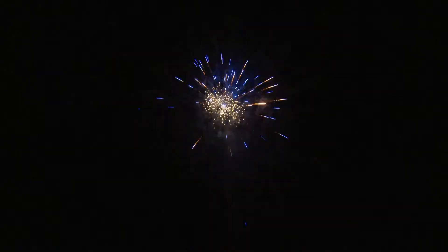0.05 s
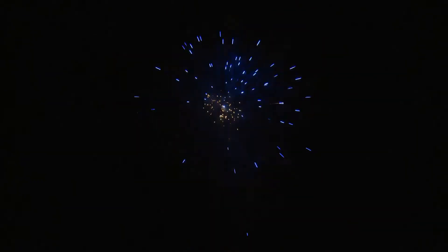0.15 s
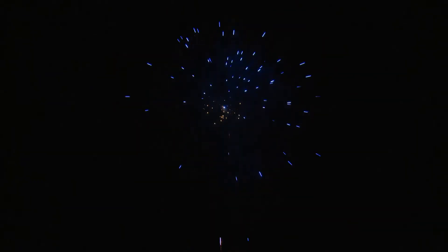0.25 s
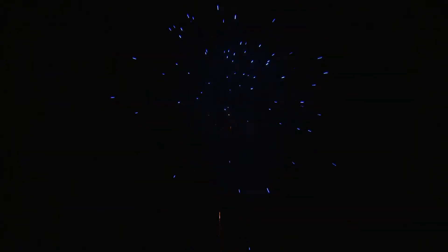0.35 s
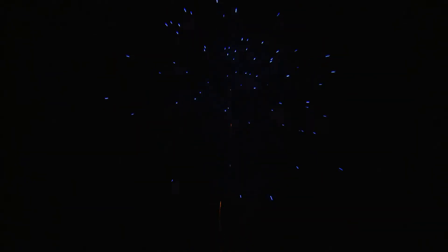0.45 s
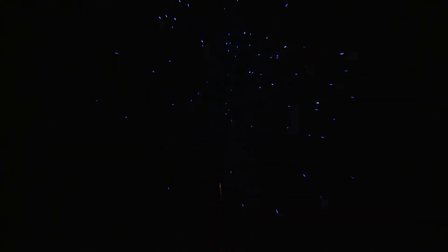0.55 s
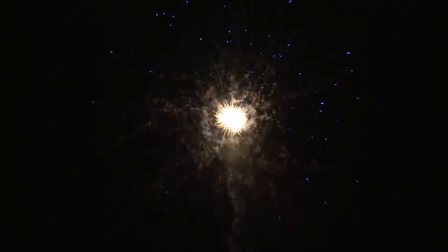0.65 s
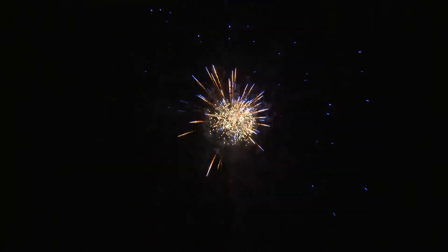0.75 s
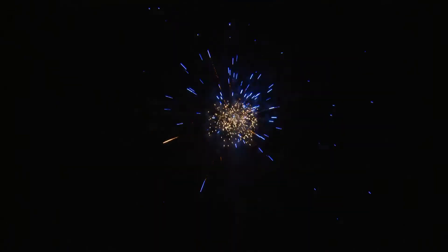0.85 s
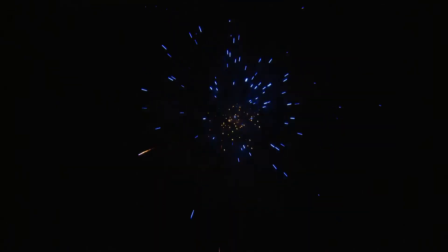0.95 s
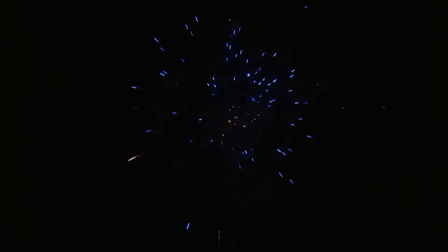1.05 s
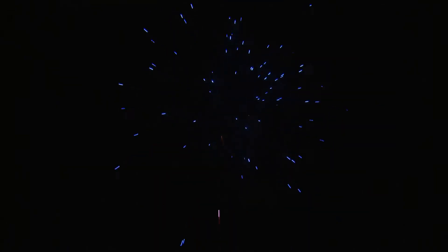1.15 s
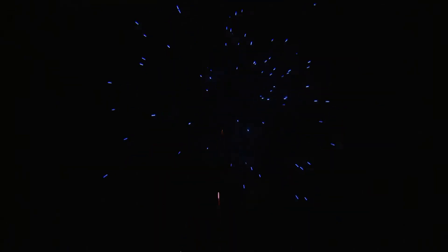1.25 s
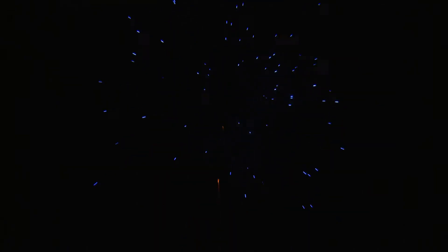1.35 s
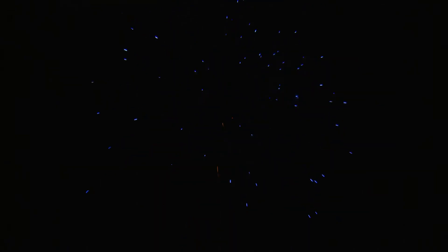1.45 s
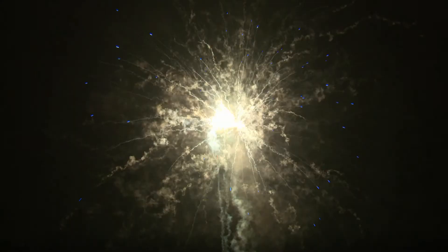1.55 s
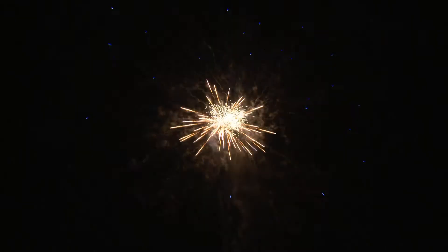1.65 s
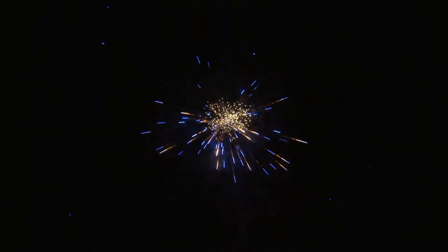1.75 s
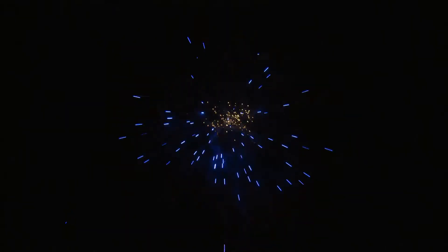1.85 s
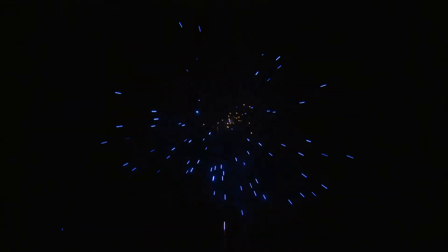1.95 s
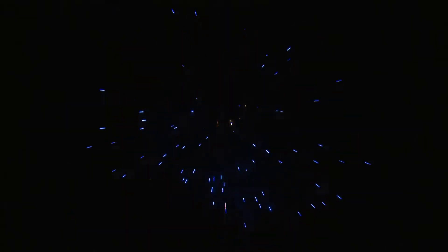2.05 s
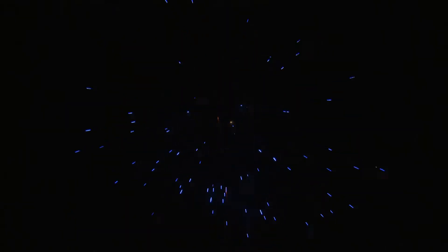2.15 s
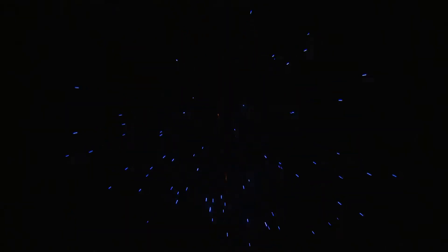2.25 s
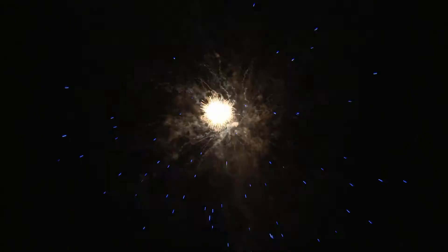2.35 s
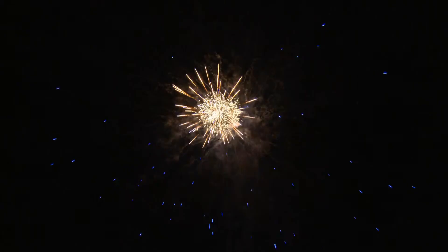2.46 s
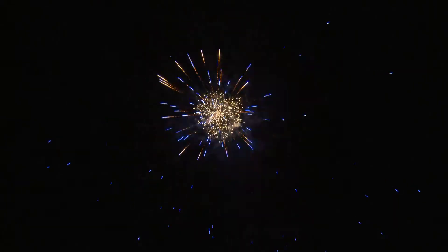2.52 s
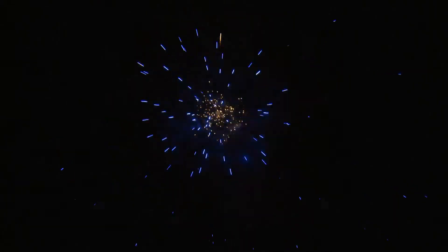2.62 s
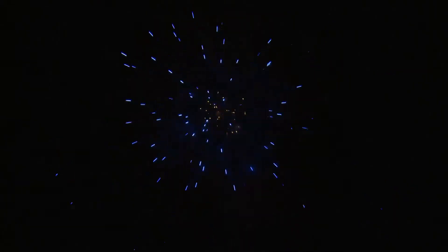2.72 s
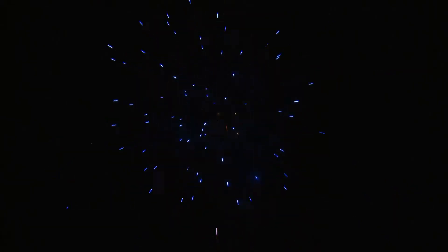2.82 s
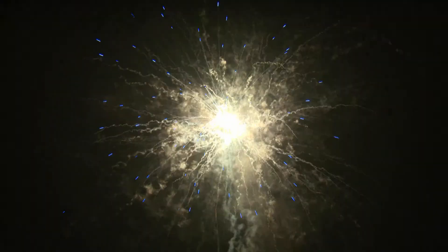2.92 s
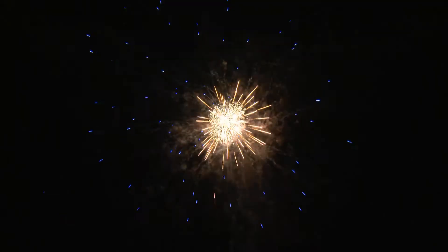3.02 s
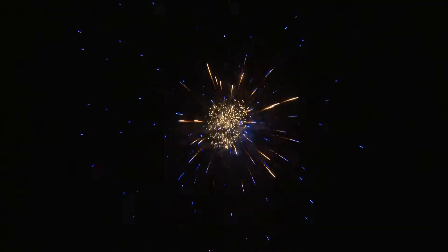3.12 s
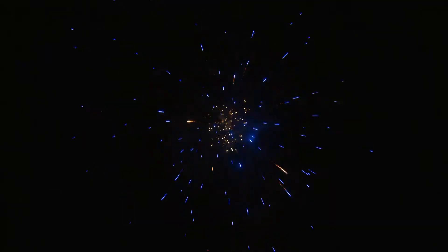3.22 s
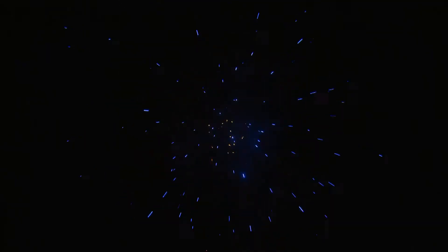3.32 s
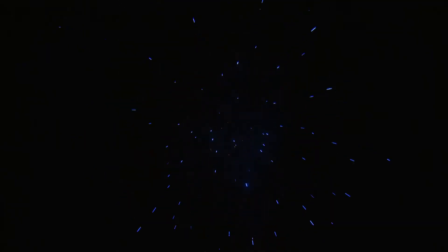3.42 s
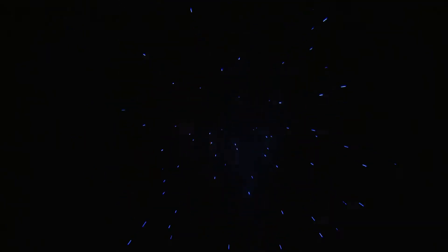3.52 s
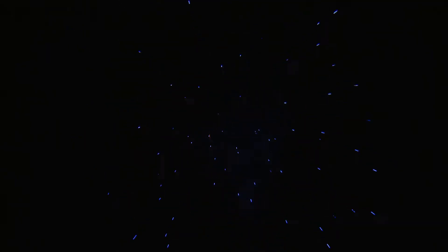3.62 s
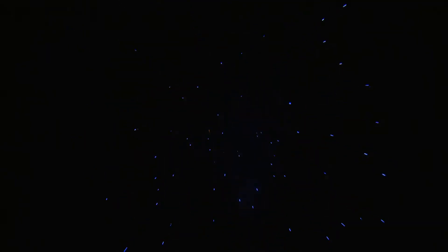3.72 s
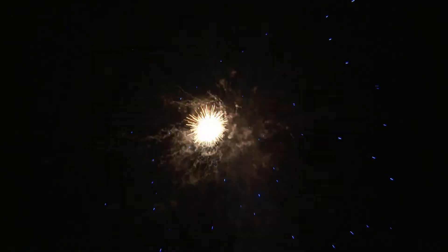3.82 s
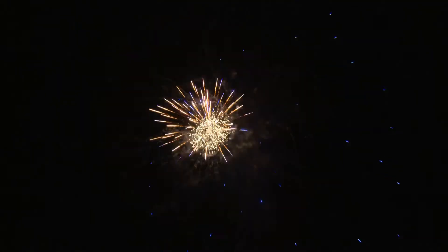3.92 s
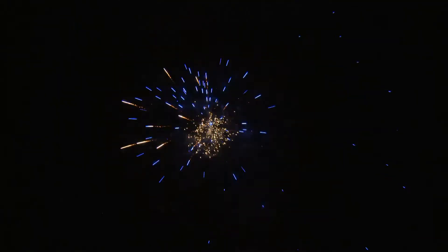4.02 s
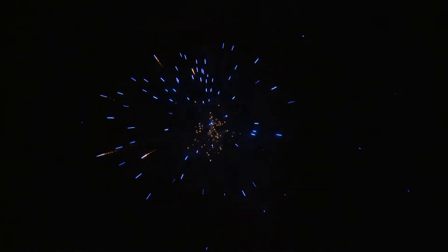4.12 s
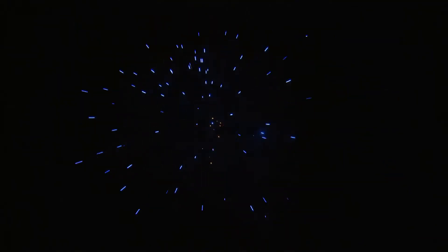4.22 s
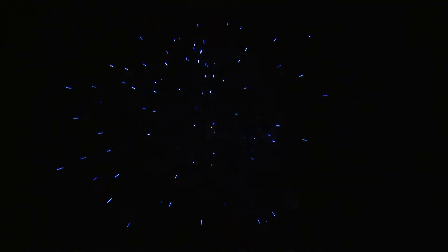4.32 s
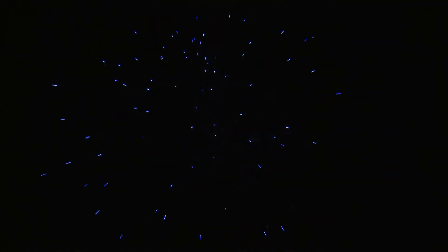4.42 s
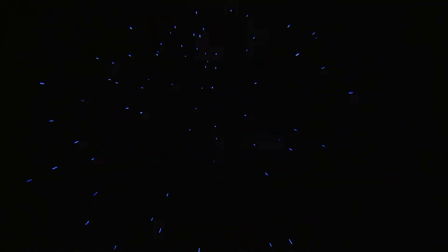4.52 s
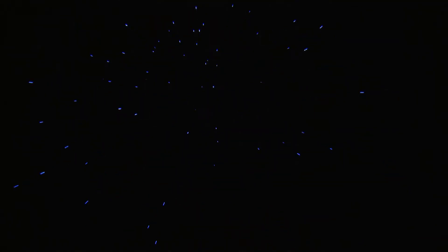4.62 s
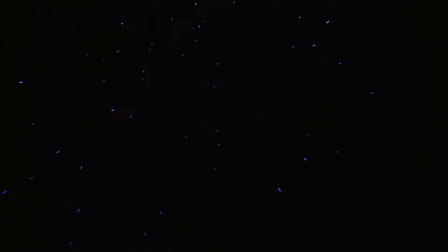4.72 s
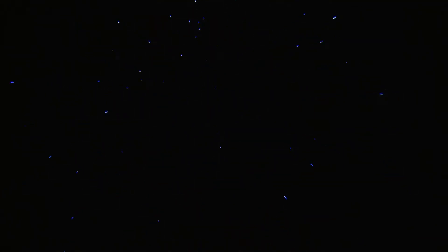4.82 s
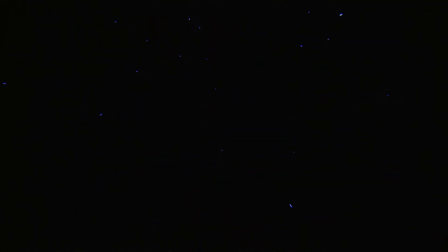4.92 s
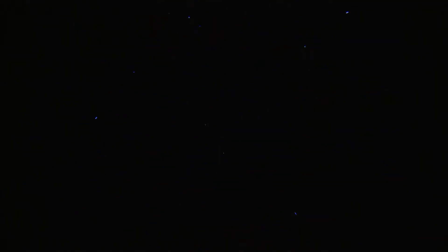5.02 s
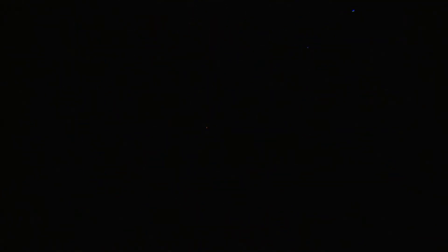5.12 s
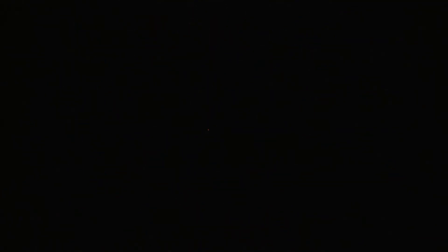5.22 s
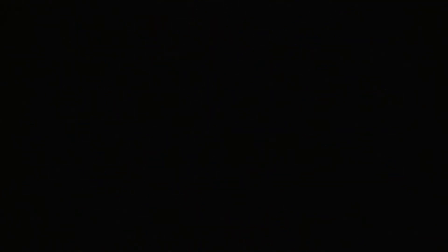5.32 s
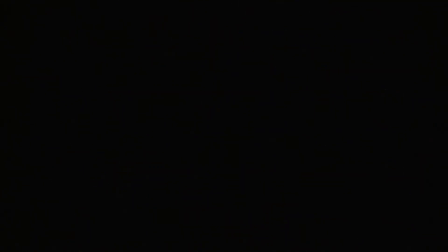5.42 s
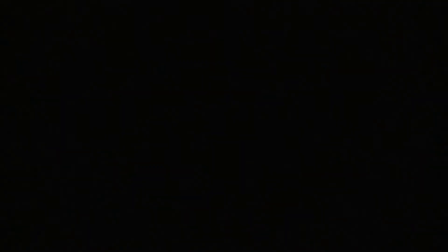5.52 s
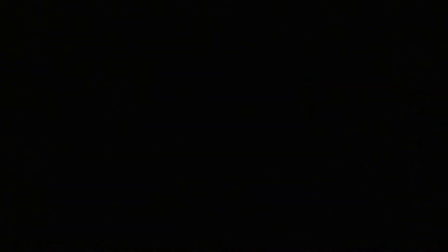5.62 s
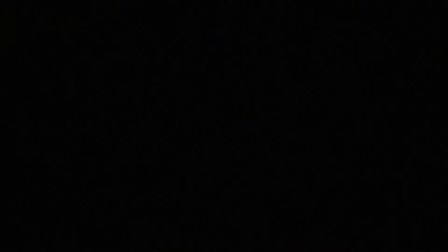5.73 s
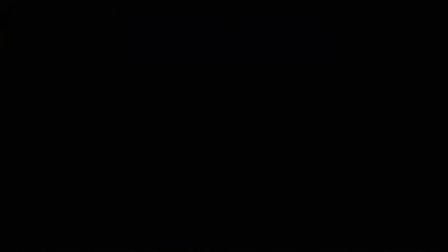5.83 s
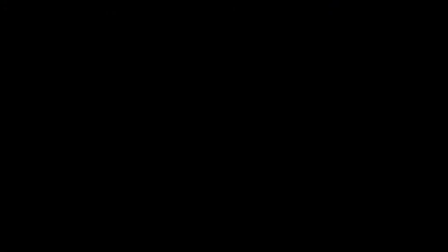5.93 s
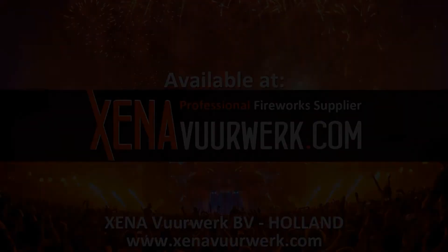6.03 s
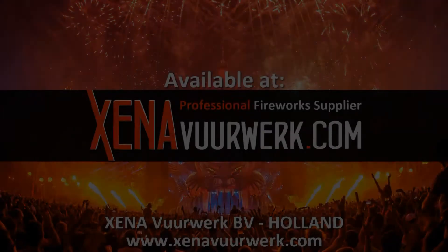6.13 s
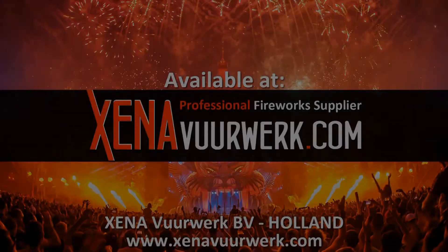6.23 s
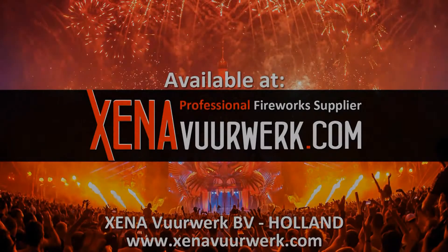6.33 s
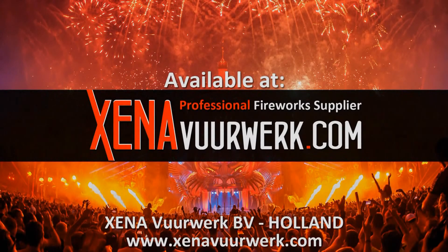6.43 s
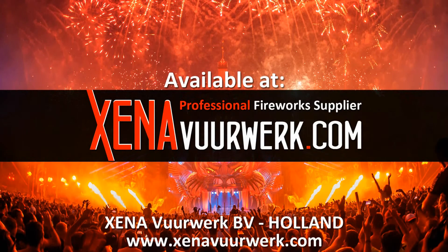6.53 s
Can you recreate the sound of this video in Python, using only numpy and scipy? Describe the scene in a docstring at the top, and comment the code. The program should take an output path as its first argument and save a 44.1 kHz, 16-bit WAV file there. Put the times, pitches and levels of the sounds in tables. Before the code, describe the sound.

A fireworks cake fires outdoors at night over an open field. Six very loud, sharp shell bursts overload a small camera microphone, roughly half a second to a second apart. Three are preceded by short hollow mortar thumps with a hiss of gas. Each bang leaves close scatter, a brief crackling sizzle, soft returned thuds from far walls and trees, and a low roll. Faint traffic hum lies below; everything fades out.

```python
"""Fireworks cake over an open field, at night

Mortar tubes thump, crack and hiss; shells burst overhead as steep pressure pushes that overload a small
camera microphone on a tripod. Decaying noise makes the scatter near the camera, the roll over the field
and the sizzling stars; far walls and tree lines return soft thuds, snaps and scatter.
A low noise hum of distant traffic with a few ticks lies below, and all fades out."""
import sys
import numpy as np
from scipy import signal
from scipy.fft import rfft, irfft, next_fast_len
from scipy.io import wavfile
from scipy.ndimage import uniform_filter1d, map_coordinates

SR = 44100
rng = np.random.default_rng(int(sys.argv[2]) if len(sys.argv) > 2 else 0)


def wav_record(signal):
    """Record a signal, one row per channel, as 16-bit PCM in the file named by sys.argv[1]."""
    frames = np.transpose(np.atleast_2d(signal))
    bounded = np.clip(frames, -1, 1)
    # unit amplitude maps onto the largest positive 16-bit level
    quanta = np.round(bounded * 32767).astype(np.int16)
    wavfile.write(sys.argv[1], SR, quanta)


def ratio_of_db(decibels):
    """Turn decibels (scalar or array-like) into linear amplitude factors; 0 dB maps to 1."""
    return 10 ** (np.asarray(decibels, float) / 20)


N = 289737  # length in samples

# Distant traffic behind the field. Each row: frequency in Hz, relative density in dB per Hz.
HUM_SPECTRUM = [(15, -33), (25, -7.5), (65, -1.5), (138, 1.5), (182, 2), (232, -11.5), (524, -16),
                (878, -23.5), (1180, -18), (1550, -27), (1900, -39.5), (3500, -45.5), (4860, -45.5),
                (6550, -54.5), (14400, -61), (16500, -84.5)]
# Small ticks. Each row: start in seconds, level in dB before the envelope.
TICKS = [(3.895, -32.5), (4.6805, -30.5), (5.117, -35.5), (5.281, -29), (5.97, -34)]
# Width of noise at the microphone. Each row: frequency in Hz, side against mid in dB.
SIDE_LEVEL = [(60, -25), (380, -14), (800, -28.5), (1500, -32), (12000, -16.5)]
# Far walls and tree lines. Each row: delay in seconds, thud level in dB, treble tilt in dB,
# scatter level in dB, swell time in seconds.
WALLS = [(0.371, -36, 0.5, -38, 0.0066), (0.5148, -21, -4, -31.5, 0.0078), (0.601, -44.5, -2.5, -34, .008),
         (0.786, -33, -3.5, -67.5, .01), (.825, -54.5, 14.5, -57, 0.02), (.995, -53.5, -4.5, -46.5, 0.04),
         (1.1, -67.5, -7, -47.5, 0.087)]
# Scatter returned by the walls. Each row: frequency in Hz, relative density in dB per Hz.
WALL_SPECTRUM = [(59, -31.5), (100, -3.5), (267, -9), (619, -15), (836, -17), (1490, -21.5), (2520, -48.5),
                 (4870, -43), (12000, -72.5), (15600, -99), (22000, -120)]
# Mortar lifts. Each row: start in seconds, thump level in dB.
LIFTS = [(0.7064, -17), (1.559, -16), (2.4291, -15.5)]
# Tones of the mortar tube. Each row: frequency in Hz, level in dB against the thump level,
# time of the peak in ms, spread in ms.
TUBE_TONES = [(135, 11.5, 5.63, 2.5), (387, 3, 7.04, 1.95), (224, -7, 16, 11), (567, -20.5, 1.1, 3.4),
              (1300, -33, 2.5, 6)]
# Gas leaving the tube. Each row: frequency in Hz, relative density in dB per Hz.
GAS_SPECTRUM = [(590, -31.5), (1000, 2.5), (3050, -11), (5480, -6), (6690, -10.5), (14300, -20.5),
                (16500, -48)]
# Shell bursts. Each row: time of the shock in seconds, blast level in dB, right channel lag in ms,
# right channel treble in dB, extra path of the wall returns in ms.
BURSTS = [(.1067, 13, 0.29, -11.5, -4.5), (0.8848, 15.5, 0.34, -1, 0.6), (1.8027, 16, .3, 5.5, 1.5),
          (2.5885, 16, 0.2, -5, -2.5), (3.1877, 16, 0.17, -6.5, -0.5), (4.0341, 14, 0.25, -13, -0.5)]
# Paths of a burst to the microphone: tripod, air, ground, nearby things.
# Each row: time after the shock in ms, push level in dB, body ring level in dB.
PATHS = [(-2.1, -22, -20), (0, 0, -15), (6.1, -21, -15), (16.8, -34, -5)]
# Resonances of the camera body. Each row: frequency in Hz, width in Hz, level in dB.
BODY = [(369, 31, -6.5), (565, 33, -6.5), (1210, 270, -15), (2110, 330, -21)]
# Scatter near the camera, of bursts and lifts. Each row: frequency in Hz, relative density in dB per Hz.
NEAR_SPECTRUM = [(18, -34.5), (30, -8.5), (80, 1), (306, -3.5), (455, -5), (533, -3), (881, -16.5),
                 (1210, -10), (2220, -24.5), (4900, -31.5), (14800, -45), (16500, -63.5)]
# Its decay. Each row: frequency in Hz, time to fall 60 dB in seconds.
NEAR_T60 = [(60, 0.2), (300, 0.22), (1200, .16), (2500, 0.11), (5000, 0.16), (9000, .2), (14000, 0.079)]
# Roll over the field. Each row: frequency in Hz, relative density in dB per Hz.
FIELD_SPECTRUM = [(18, -45), (30, -19), (185, -6.5), (314, -11.5), (432, -12.5), (835, -25), (1180, -23),
                  (1940, -46), (3200, -43.5), (4900, -39), (6500, -46.5), (10500, -48), (15200, -53),
                  (16500, -77.5)]
# Its decay. Each row: frequency in Hz, time to fall 60 dB in seconds.
FIELD_T60 = [(60, 1.7), (500, 0.46), (2000, 1.4), (5000, .9), (8000, 0.89), (13000, 0.42)]
# Sizzle of the stars overhead. Each row: frequency in Hz, relative density in dB per Hz.
STARS_SPECTRUM = [(600, -32.5), (1000, 2.5), (3050, -16), (5000, -9.5), (6700, -12.5), (10000, -15.5),
                  (14300, -15.5), (16500, -47)]
# Its decay. Each row: frequency in Hz, time to fall 60 dB in seconds.
STARS_T60 = [(2000, .2), (6000, 0.28), (14000, 0.17)]
# Span in which the right channel thins: from, to, in seconds.
THIN_SPAN = (.101, .119)
# Fade to silence: from, to, in seconds.
FADE_SPAN = (5.03, 6.023)
# The recorder's treble rolls off between these: from, to, in Hz.
TREBLE_EDGE = (15800, 16700)


def unit(x):
    """Scale to rms 1."""
    return x / np.sqrt(np.mean(x ** 2) + 1e-20)


def along(points, hz):
    """Read (Hz, value) points on a log frequency axis."""
    f, v = np.transpose(points)
    return np.interp(np.log(hz + 1), np.log(f + 1), v)


def filtered(x, response):
    """Apply a complex response of frequency."""
    n = x.shape[-1]
    m = next_fast_len(n + 8192)
    return irfft(rfft(x, m) * response(np.fft.rfftfreq(m, 1 / SR)), m)[..., :n]


def low_pass(hz):
    """First-order response that dulls sound above hz."""
    return lambda f: 1 / (1 + 1j * f / hz)


def rise(t, seconds):
    """Straight onset from 0 to 1."""
    return np.clip(t / seconds, 0, 1)


def add(into, x, s):
    """Mix x into the scene at time s."""
    k = round(s * SR)
    into[:, k:k + x.shape[-1]] += x[..., :N - k]


def rush(n, spectrum):
    """Nearly centred stereo noise of rms 1: shaped mid noise with a weaker, independent side."""
    def response(hz):
        return ratio_of_db(along(spectrum, hz)) * [np.ones_like(hz), ratio_of_db(along(SIDE_LEVEL, hz))]
    mid, side = filtered(rng.standard_normal((2, n)), response)
    return unit(np.array([mid + side, mid - side]))


def dying(seconds, spectrum, t60, lumpy_db):
    """Scattered sound: each frequency dies at its own speed, in lumps as separate echoes arrive."""
    n = round(seconds * SR)
    hz, t, z = signal.stft(rush(n, spectrum), SR, nperseg=256)
    lumps = uniform_filter1d(rng.standard_normal(z.shape[1:]), size=3, axis=1)
    lumps = unit(uniform_filter1d(lumps, size=12, axis=0))
    decay_db = -60 * t / along(t60, hz)[:, None]
    return signal.istft(z * ratio_of_db(lumpy_db * lumps + decay_db), SR, nperseg=256)[1][:, :n]


def ticks():
    """Small ticks, each a sine with a rounded onset that rings briefly."""
    out, t = np.zeros((2, N)), np.arange(2000) / SR
    pitch_hz, t60_s, onset_s = 1280, 0.017, 0.00084
    for s, db in TICKS:
        envelope = ratio_of_db(db - 60 * t / t60_s) * (1 - np.exp(-t / onset_s))
        add(out, envelope * np.sin(2 * np.pi * pitch_hz * t), s)
    return out


def hum():
    """Distant traffic: shaped noise whose low part throbs and whose upper part flutters slightly."""
    now = np.arange(N) / SR
    throb_rate, flutter_rate = 14, 30  # random levels per second, smoothly joined
    throb = map_coordinates(rng.standard_normal(N * throb_rate // SR + 4), [now * throb_rate])
    flutter = map_coordinates(rng.standard_normal(N * flutter_rate // SR + 4), [now * flutter_rate])
    noise = rush(N, HUM_SPECTRUM)
    low = filtered(noise, lambda f: 1 / (1 + (f / 300) ** 4))
    throbbing = ratio_of_db(-48.5 + 3.2 * throb) * unit(low)  # dB
    fluttering = ratio_of_db(-54.5 + 0.44 * flutter) * unit(noise - low)
    return throbbing + fluttering


def walls():
    """Distance rounds the shock into a soft swing, a dull snap that rings the body, and scatter."""
    out, t = np.zeros((2, N)), np.arange(SR // 2) / SR
    for delay, thud_db, treble_db, scatter_db, swell in WALLS:
        u = t / .0065
        thud = -np.sin(2 * np.pi * 85 * (t + .001)) * u * np.exp(1 - u) * rise(t, 0.0043)
        ring_hz = rng.normal(1100, 110)
        snap = np.exp(-((t - swell) / .0024) ** 2) * np.sin(2 * np.pi * ring_hz * t)
        snap_db = scatter_db - 2.5 - 4.2 * swell / 0.042  # a slower swell blurs the snap

        def surface(f):  # foliage returns more treble than stone
            return ratio_of_db(treble_db * f ** 2 / (f ** 2 + 2500 ** 2))
        scatter = filtered(rush(len(t), WALL_SPECTRUM), surface) * (t / swell) * np.exp(1 - t / swell)
        echo = ratio_of_db(thud_db) * thud + ratio_of_db(snap_db) * snap + ratio_of_db(scatter_db) * scatter
        add(out, ratio_of_db(rng.normal(0, 0.73)) * echo, delay)  # level varies from burst to burst
    return out


def lifts():
    """The tube swells into a thump of short tones, cracks, and hisses as the shell leaves."""
    out, t = np.zeros((2, N)), np.arange(SR // 2) / SR
    ms = t * 1000
    gas_delay_s, gas_t60_s = 0.012, 0.052
    for s, db in LIFTS:
        thump = sum(ratio_of_db(level) * np.exp(-((ms - peak) / spread) ** 2) * np.cos(2 * np.pi * hz * t)
                    for hz, level, peak, spread in TUBE_TONES)
        muzzle = ratio_of_db(-1.0) * np.exp(-(ms / .9) ** 2)
        crack = ratio_of_db(-38 - 60 * np.abs(t - .004) / .025) * (t > .0035) * rush(len(t), GAS_SPECTRUM)
        # the shell clears the muzzle
        gas = ratio_of_db(db - 17.5 - 60 * (t - gas_delay_s) / gas_t60_s) * rise(t - gas_delay_s, .001)
        gas = gas * rush(len(t), GAS_SPECTRUM)
        rumble = ratio_of_db(db - 16.5) * dying(.5, NEAR_SPECTRUM, NEAR_T60, lumpy_db=6.0) * rise(t, 0.0058)
        # the climbing shell
        trail = ratio_of_db(-72.0) * np.exp(-((t - .09) / 0.079) ** 2) * rush(len(t), GAS_SPECTRUM)
        push = ratio_of_db(db) * (thump + muzzle) * rise(t, 0.0004)
        add(out, push + crack + gas + rumble + trail, s + .0004)
    return out


def shock(push_ms, capsule_hz, width_hz):
    """A steep pressure push along each path; the capsule swings back past rest, the body rings."""
    t = np.arange(SR // 5) / SR * 1000 - 5  # ms; the shock comes 5 ms in
    pushes = np.array([(t >= ms) * np.exp(-(np.clip(t - ms, 0, None) / push_ms) ** 3)
                       for ms, _, _ in PATHS])
    indirect = [0, 2, 3]
    pushes[indirect] = filtered(pushes[indirect], low_pass(1200))  # duller than the direct path
    pushes = filtered(pushes, low_pass(7000))  # air rounds the front
    _, push_db, ring_db = np.transpose(PATHS)

    def capsule(f):
        return -f * f / (capsule_hz ** 2 - f * f + 1j * f * width_hz)

    def body(f):
        return sum(ratio_of_db(db) * 1j * f * w / (c * c - f * f + 1j * f * w) for c, w, db in BODY)
    return filtered(ratio_of_db(push_db) @ pushes, capsule) + filtered(ratio_of_db(ring_db) @ pushes, body)


def stereo_shock(wave, lag_ms, right_db):
    """The early part of the shock reaches the right channel later, duller and with its own treble level."""
    early = np.interp(np.arange(len(wave)) / SR, [.008, .011], [1, 0])

    def slant(f):  # the level change spares the bass
        delay = np.exp(-2j * np.pi * f * lag_ms / 1000)
        return ratio_of_db(right_db * f / (f + 300)) * low_pass(700)(f) * delay
    return np.array([wave, wave + early * (filtered(wave, slant) - wave)])


def right_spit():
    """A very short puff of noise at the shock, far stronger in the right channel."""
    t = np.arange(SR // 10) / SR
    spit = rng.standard_normal((2, len(t))) * ratio_of_db([[-18], [1]]) * np.exp(-((t - .0007) / 0.00038) ** 2)
    return filtered(spit, lambda f: low_pass(6000)(f) ** 2)


def tripod_tick():
    """A sharp tick of noise runs up the tripod, with a weaker, slower tail."""
    t = np.arange(SR // 10) / SR
    envelope = ratio_of_db(-30 - 60 * t / 0.058) + ratio_of_db(-18.5 - 60 * t / 0.0013)
    return envelope * rush(len(t), [(1500, -10), (7000, -1), (16000, -6)])  # Hz, relative dB per Hz


def bursts():
    """Shock, tripod tick, spit of noise, near scatter, the long roll, the stars and the wall returns."""
    out = np.zeros((2, N))
    wave = shock(push_ms=0.76, capsule_hz=104, width_hz=99)
    for s, db, lag_ms, right_db, path_ms in BURSTS:
        roll_db = -11 + .35 * (db - 17.5)  # scatter follows the blast only in part
        add(out, ratio_of_db(db) * stereo_shock(wave, lag_ms, right_db), s - .005)
        add(out, right_spit(), s + lag_ms / 1000)
        add(out, tripod_tick(), s - .0028)  # ahead of the shock
        near = dying(0.23, NEAR_SPECTRUM, NEAR_T60, lumpy_db=2.68)
        add(out, ratio_of_db(roll_db) * near * rise(np.arange(near.shape[1]) / SR, 0.0034), s + .003)
        far = dying(1.9, FIELD_SPECTRUM, FIELD_T60, lumpy_db=1.1)
        add(out, ratio_of_db(roll_db - 18.5) * far * rise(np.arange(far.shape[1]) / SR, 0.021), s + 0.008)
        stars = dying(0.65, STARS_SPECTRUM, STARS_T60, lumpy_db=2.7)  # burning stars sizzle
        add(out, ratio_of_db(roll_db - 31.5) * stars, s + .006)
        add(out, walls(), s + path_ms / 1000)
    return out


def scene():
    """All sources in the field."""
    return hum() + ticks() + lifts() + bursts()


def top_cut(x):
    """Nothing passes above the cut-off."""
    return signal.sosfilt(signal.butter(12, 16790, fs=SR, output="sos"), x)


def record(dry):
    """The microphone input clips, the right channel briefly thins, the end fades, the treble rolls off."""
    now = np.arange(N) / SR
    left, right = dry / (1 + np.abs(dry) ** 8) ** (1 / 8)
    thin = filtered(right, lambda f: 0.68 * 1j * f / (900 + 1j * f))  # less bass, and softer
    start, end = THIN_SPAN
    share = np.interp(now, [start - .002, start, end - .003, end], [0, 1, 1, 0])
    mix = np.array([left, right + share * (thin - right)]) * np.interp(now, FADE_SPAN, [1, 0])
    mix = filtered(mix, lambda f: np.interp(f, TREBLE_EDGE, [1, 0]) ** 2)
    return top_cut(mix)


dry = scene()
out = record(dry)
wav_record(out)
```